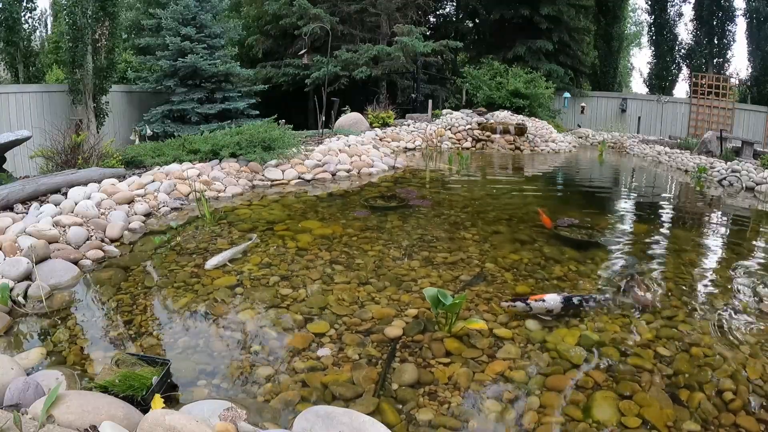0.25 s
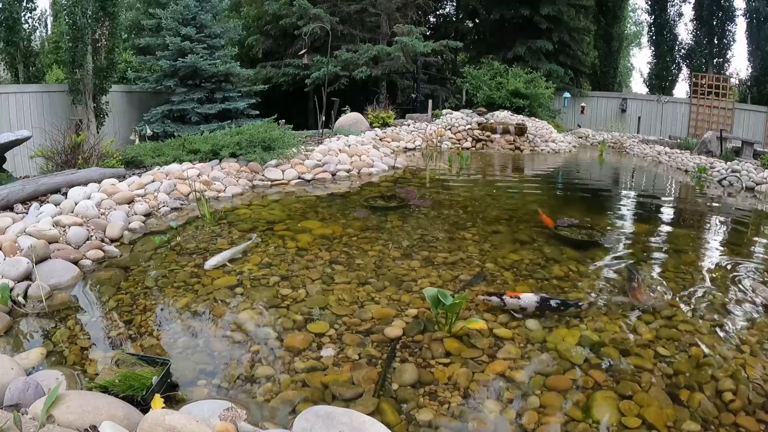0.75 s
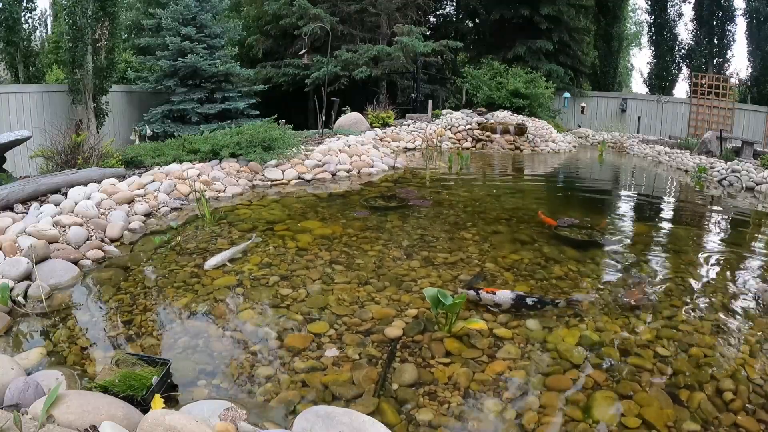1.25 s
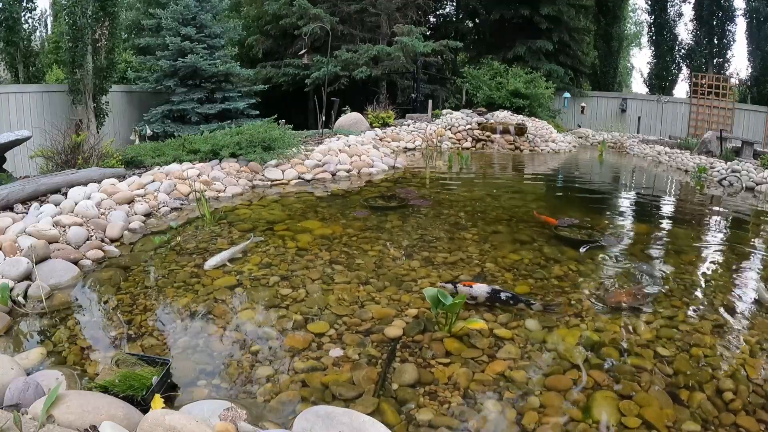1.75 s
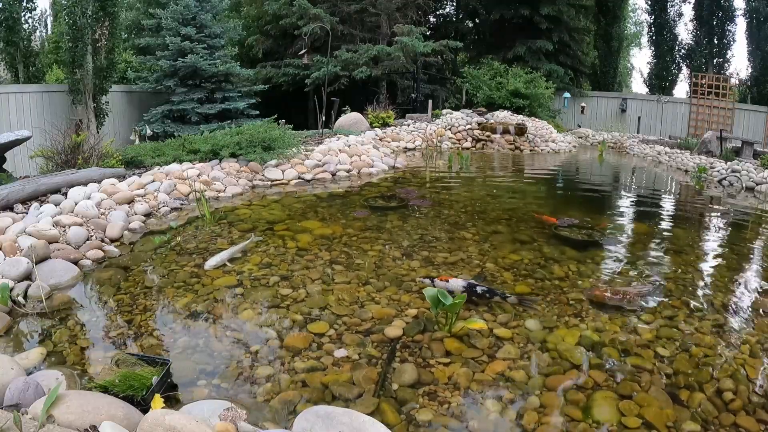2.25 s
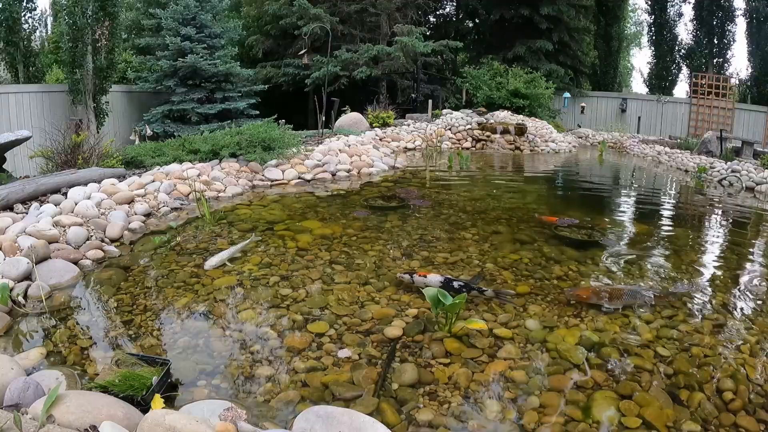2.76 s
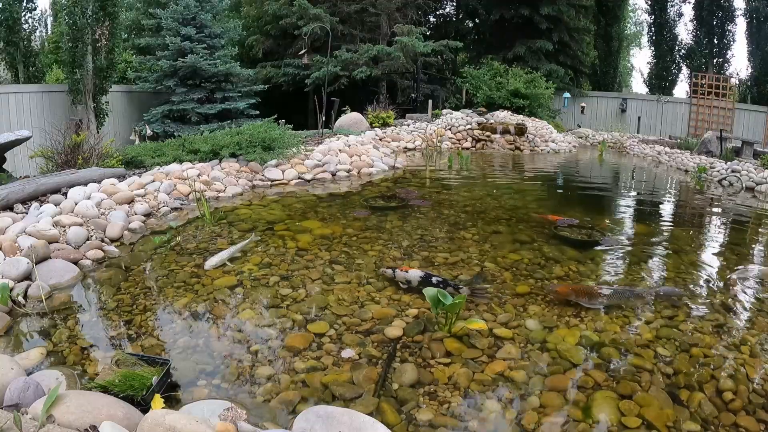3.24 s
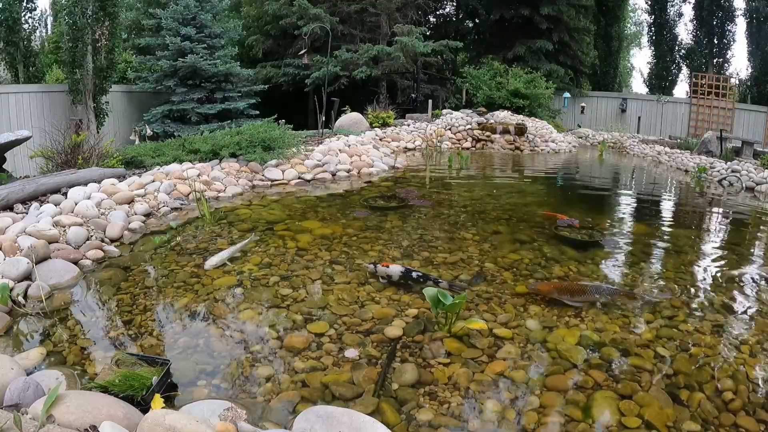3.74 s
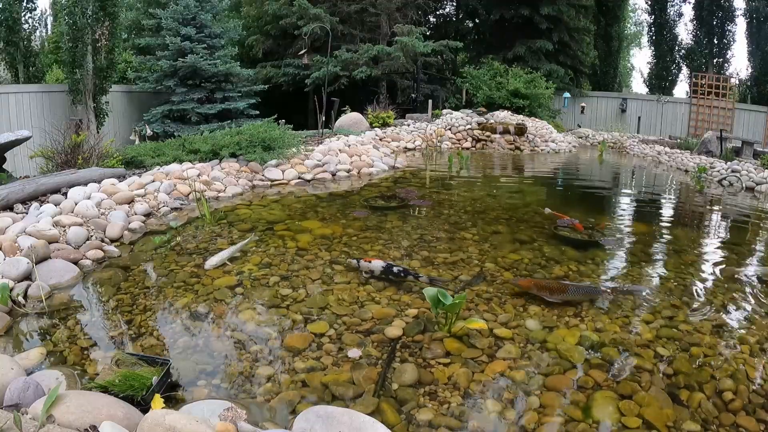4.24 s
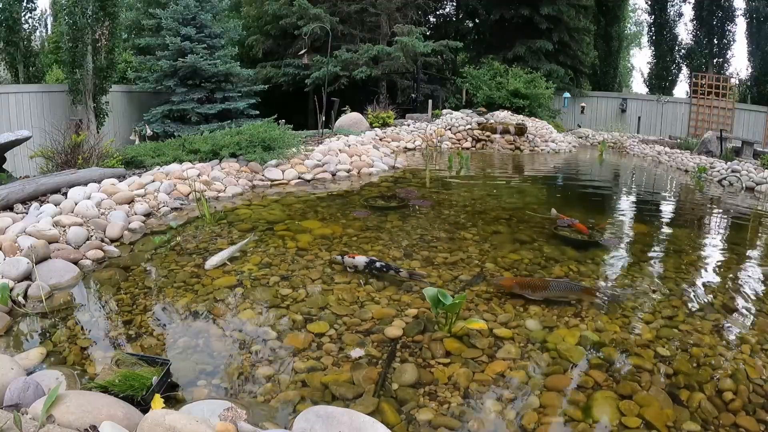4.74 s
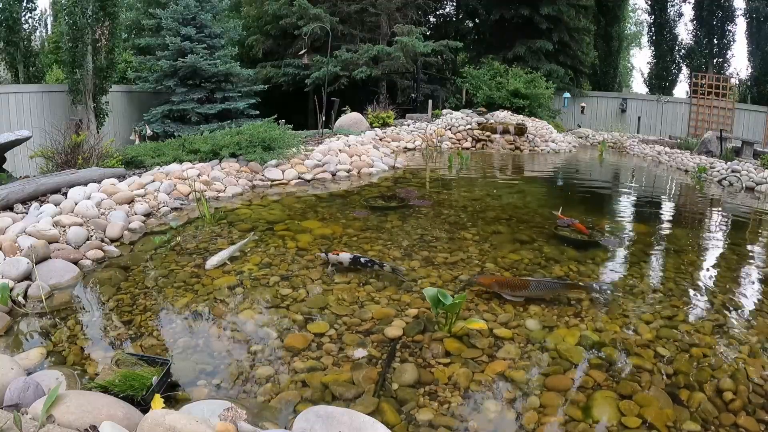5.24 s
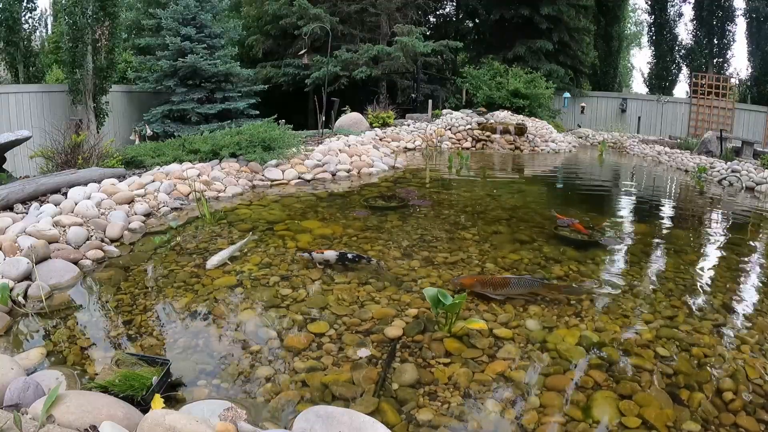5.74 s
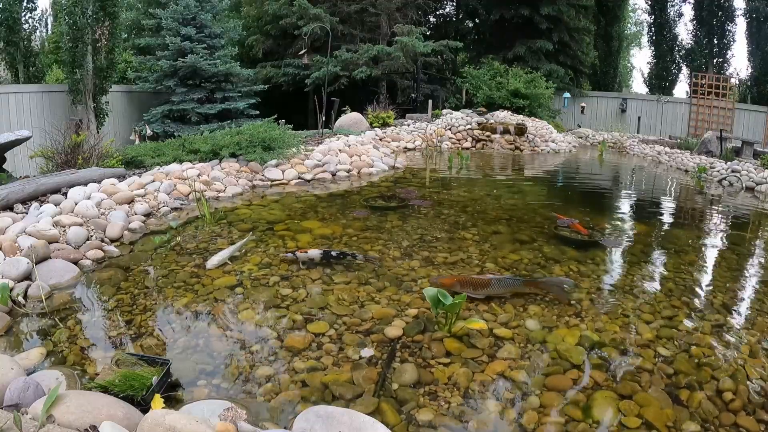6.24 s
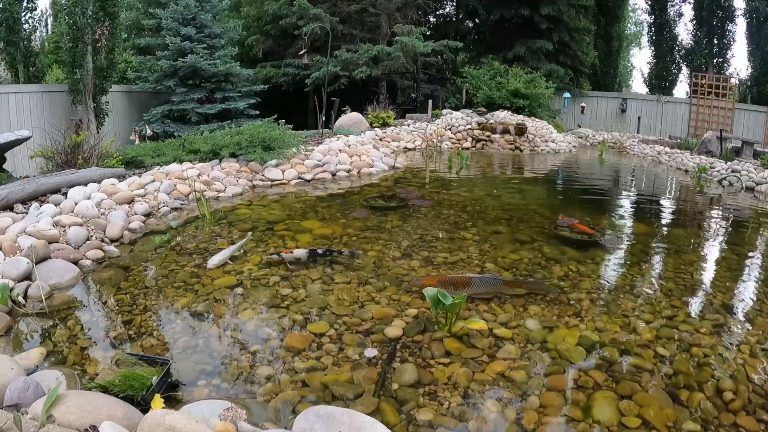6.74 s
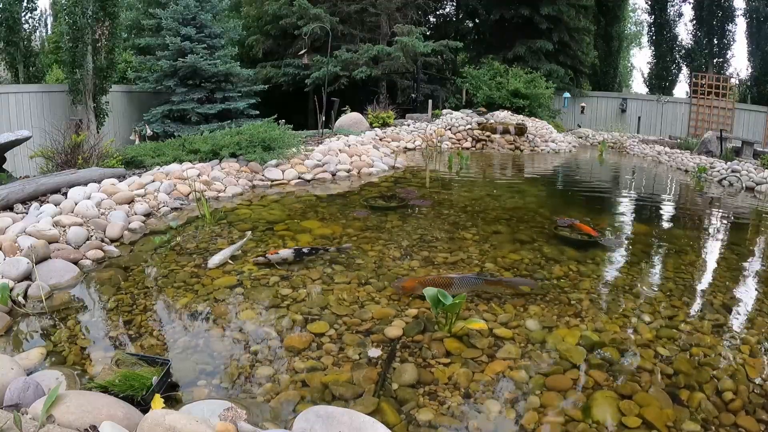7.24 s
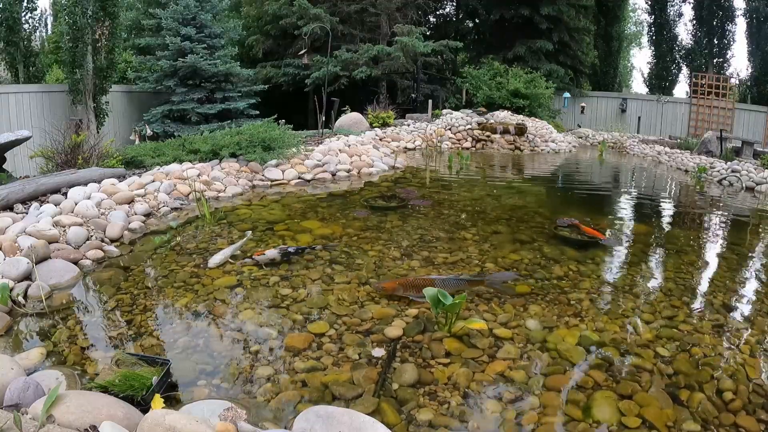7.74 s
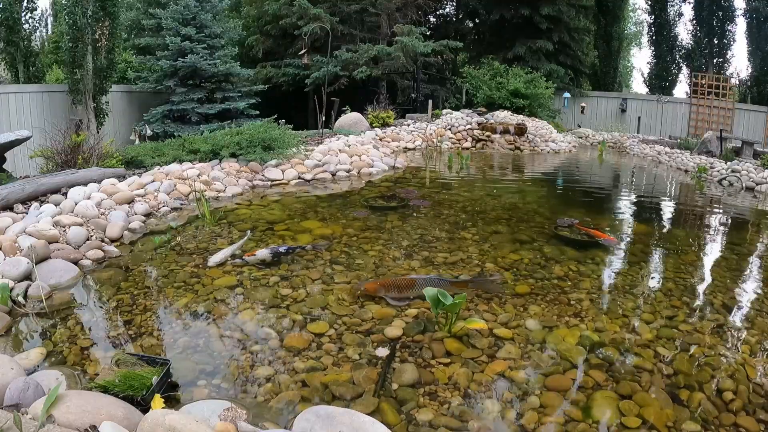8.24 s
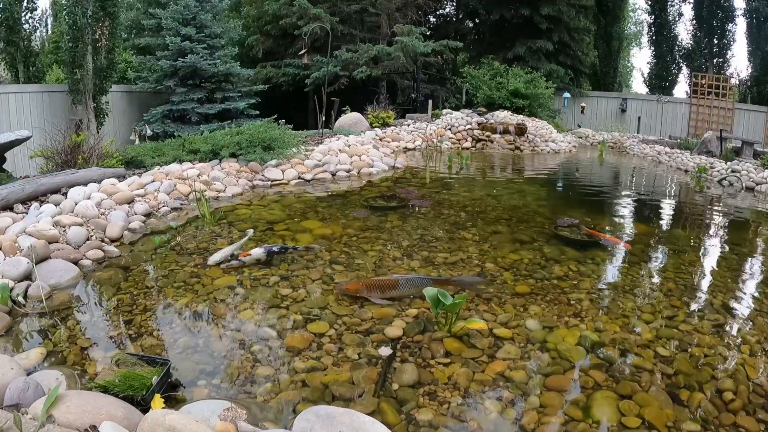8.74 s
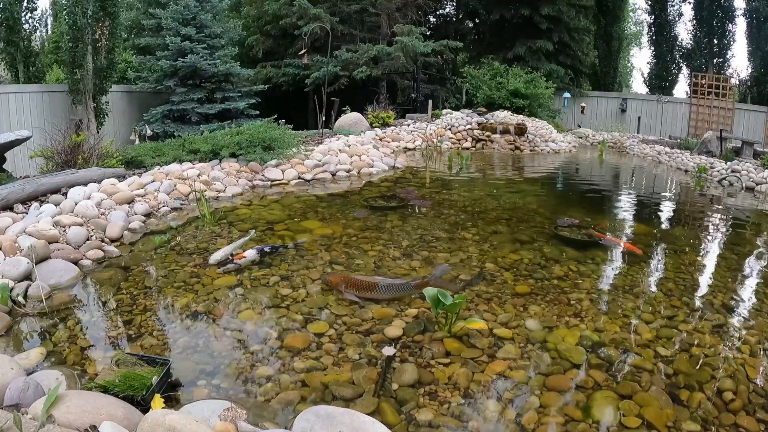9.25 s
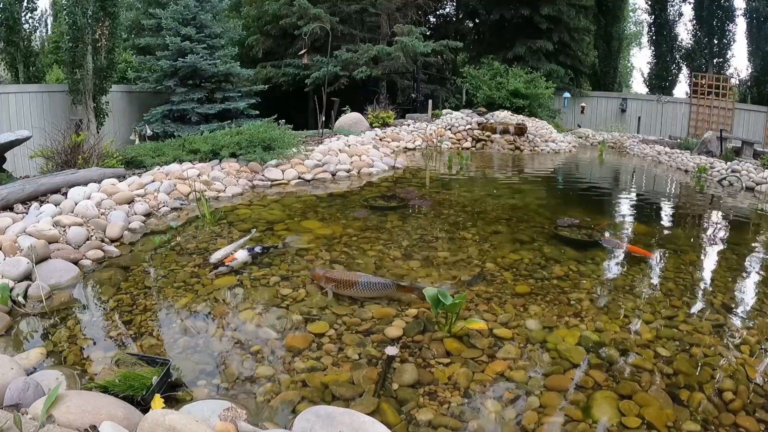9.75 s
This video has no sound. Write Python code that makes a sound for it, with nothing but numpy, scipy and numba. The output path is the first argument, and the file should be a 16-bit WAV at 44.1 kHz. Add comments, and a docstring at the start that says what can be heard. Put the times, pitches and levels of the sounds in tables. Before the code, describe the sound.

Unbroken splashing and trickling in a garden pond, heard in stereo from a few metres away. Bubbles chirp upward over a soft noisy rush, with irregular gurgles, tiny droplet plinks and crisp spatters on stone. Around the middle a watery slap stands out; later comes a cluster of louder gulps and a near plop. Wind rumbles low and unevenly against the microphone throughout.

```python
"""Garden waterfall and pond

A small waterfall spills over stones into a garden pond, a few metres from the microphone.
Sliding sines make the bubbles, tiny clicks the spray, shaped noise the rush, slaps and spatters.
One near drop plops. The fence and stones answer faintly with a short scatter of decaying noise.
A light breeze, low noise in quick swells, rumbles on the microphone."""
import sys
import numpy as np
from scipy import signal
from scipy.fft import rfft, irfft, next_fast_len
from scipy.io import wavfile
from scipy.ndimage import uniform_filter1d, map_coordinates
from numba import njit

SR = 44100
rng = np.random.default_rng(int(sys.argv[2]) if len(sys.argv) > 2 else 0)


def generate_wav(sig):
    """Save sig (samples, or channels by samples) to the path in sys.argv[1] as 16-bit PCM at SR."""
    pcm = np.round(np.clip(np.atleast_2d(sig).T, -1, 1) * 32767).astype(np.int16)
    wavfile.write(sys.argv[1], SR, pcm)


N = 440559  # length in samples, about 10 s
TOP_HZ = 14900  # the band limit, and the highest starting pitch of a clump's bubbles


def amp(db):
    """Turn decibels into a gain."""
    return 10 ** (np.asarray(db) / 20)


def unit(x):
    """Scale to rms 1."""
    return x / np.sqrt(np.mean(x ** 2) + 1e-20)


def along(points, hz):
    """Read a curve of (Hz, value) points on a log frequency axis."""
    point_hz, value = np.transpose(points)
    return np.interp(np.log(hz + 1), np.log(point_hz + 1), value)


def curves(rows):
    """Give one value per sample for each column after the time."""
    time_s, *columns = np.transpose(rows)
    return [np.interp(np.arange(N) / SR, time_s, column) for column in columns]


def wobble(rate):
    """A smooth random curve through rate random points a second."""
    points = rng.standard_normal(int(N * rate / SR) + 4)
    return map_coordinates(points, [np.arange(N) * rate / SR])


def filtered(x, response):
    """Multiply the spectrum of x by a complex response of frequency."""
    size = next_fast_len(N + SR // 2)  # spare room at the end for ringing
    hz = np.fft.rfftfreq(size, 1 / SR)
    return irfft(rfft(x, size) * response(hz), size)[..., :N]


def coloured(x, spectrum):
    """Shape x by (Hz, dB) points, then scale it to rms 1."""
    return unit(filtered(x, lambda hz: amp(along(spectrum, hz))))


def steady(x, span_s):
    """Even out the slow chance swells of x, leaving it at rms 1."""
    power = uniform_filter1d(x ** 2, int(span_s * SR))
    return x / np.sqrt(np.abs(power) + 1e-9)


def swells(rows):
    """A smooth rise and fall of gain for each (start-to-end centre s, dB, length s) row."""
    t = np.arange(N) / SR
    gain = 0
    for centre_s, level_db, length_s in rows:
        phase = np.clip((t - centre_s) / length_s, -.5, .5)
        gain = gain + amp(level_db) * np.cos(np.pi * phase) ** 2
    return gain


def bursts(rows, attack_s, t60, spectrum):
    """Short puffs of noise, one for each (s, dB) row, falling 60 dB in t60 seconds."""
    t = np.arange(N) / SR
    level = 0
    for start_s, level_db in rows:
        attack = np.clip((t - start_s) / attack_s, 0, 1)
        level = level + amp(level_db - 60 * np.abs(t - start_s) / t60) * attack
    return level * coloured(rng.standard_normal(N), spectrum)


@njit
def ringing(start, size, hz, t60, rise, n, sr):
    """A sum of bubbles: sines that swell within a cycle, die away, and climb in pitch by the share rise."""
    out = np.zeros(n)
    for k in range(len(start)):
        first = int(start[k] * sr)
        for i in range(max(0, -first), min(int(t60[k] * sr), n - first)):
            age = i / sr / t60[k]
            cycle = hz[k] * i / sr * (1 + rise[k] * age / 2)
            swell = 1 - np.exp(-3 * cycle)
            decay = np.exp(-np.log(1000) * age)
            out[first + i] += size[k] * swell * decay * np.sin(2 * np.pi * cycle)
    return out


def bubbles(clumps, count, low_hz, high_hz, spread_s, spread_oct, cycles, clump_db, size_db, rise):
    """Clumps of water (so many a second) each trap count bubbles of kindred size, sliding upward."""
    rows = int(clumps * N / SR)
    draw = rng.random((rows, 3 + 5 * count))
    when, kind, weight = draw[:, :3].T[..., None]
    delay, detune, size, life, slide = np.split(draw[:, 3:], 5, axis=1)
    start = when * N / SR + spread_s * delay ** 2
    hz = low_hz * (high_hz / low_hz) ** kind * 2 ** (spread_oct * (2 * detune - 1))
    hz = np.minimum(hz, TOP_HZ)
    # gain grows with pitch, for even power per Hz
    gain = hz * amp(clump_db * weight ** 2 + size_db * size ** 2)
    t60 = cycles * (.5 + life) / hz
    return ringing(start.ravel(), gain.ravel(), hz.ravel(), t60.ravel(), 2 * rise * slide.ravel(), N, SR)


def waterfall(flow_db):
    """The middle of the fall reaches both channels alike, its flanks unlike; all of it surges together."""
    # the slow gushing of the fall, used relative to its average: start_s, strength_db
    gush = [(0.0, -40.5), (0.5, -41.5), (1.55, -40), (1.68, -43), (1.78, -41), (2.2, -40), (2.45, -41.5),
            (2.7, -42.5), (3.06, -40.5), (3.2, -41), (4.4, -41.5), (5.8, -40), (6.05, -42.5), (6.59, -41),
            (7.15, -41.5), (7.76, -41.5), (7.9, -43.5), (8.2, -41.5), (9.0, -41.5), (9.99, -41)]
    # how alike the two channels are: pitch_hz, likeness (0 to 1)
    alike = [(400, 0.86), (1200, 0.92), (2600, 0.99), (4200, 1), (6300, 0.98), (7200, 0.78), (8200, 0.38),
             (10000, 0.77), (12300, 0.67)]
    gush_db, = curves(gush)
    surge_db = .7 * (gush_db - gush_db.mean()) + .4 * wobble(22) + .6 * wobble(80)

    def turn(hz):
        return np.arccos(np.clip(along(alike, hz), 0, 1)) / 2

    middle = filtered(splashing(), lambda hz: np.cos(turn(hz)))
    flanks = filtered(splashing(), lambda hz: np.sin(turn(hz)))
    return np.array([middle + flanks, middle - flanks]) * amp(flow_db + surge_db)


def splashing():
    """A dense trickle of bubbles, chirps, fine fizz and spray over the rush of the falling sheet."""
    # tone colour of the water: pitch_hz, relative level_db
    water_colour = [(150, -7.5), (400, -1), (720, -3), (920, -.5), (2100, -3), (3000, -4.5), (4000, -6.5),
                    (5500, -11.5), (7000, -16.5), (8300, -21), (10000, -25.5), (12300, -30.5),
                    (14000, -38.5), (15000, -63)]
    trickle = bubbles(clumps=270, count=2, low_hz=520, high_hz=3390, spread_s=.012, spread_oct=.45,
                      cycles=22, clump_db=4, size_db=7, rise=0.14)
    # bubbles close under the surface ring longer and slide further up
    chirps = bubbles(clumps=150, count=1, low_hz=857.0, high_hz=5970, spread_s=.03, spread_oct=0.31,
                     cycles=56, clump_db=3, size_db=7, rise=.22)
    fizz = bubbles(clumps=400, count=3, low_hz=2600, high_hz=12340, spread_s=.007, spread_oct=0.31,
                   cycles=16.6, clump_db=2, size_db=5.5, rise=0.06)
    ticks = amp(1.3 * wobble(10)) * coloured(spray(rate=1500, size_db=10), water_colour)
    # the finest droplets fly off in fitful showers
    mist_colour = [(4000, -30), (7000, 0), (9000, -1), (12300, -3), (14000, -13), (15000, -40)]
    mist = amp(3.5 * wobble(12)) * coloured(spray(rate=260, size_db=18), mist_colour)
    rush = coloured(rng.standard_normal(N), water_colour)
    ring = amp(-6.0) * coloured(trickle, water_colour)
    ring += amp(-11.0) * coloured(chirps, water_colour)
    ring += amp(-10.5) * coloured(fizz, water_colour)
    return ring + amp(-9.0) * ticks + amp(-33.5) * mist + amp(-6.5) * rush


def spray(rate, size_db):
    """Droplets strike stone and water: a crackle of tiny impacts of uneven size, rate a second."""
    when, size, sign = rng.random((int(rate * N / SR), 3)).T
    clicks = np.sign(sign - .5) * amp(size_db * size ** 2)
    return np.bincount((when * N).astype(int), clicks, N)


def hollows(x):
    """Gaps between the stones favour a few pitches, each a resonant boost."""
    # hollows between the stones: pitch_hz, width_hz, boost_db
    gaps = [(935, 70, 2.5), (1236, 73, 3.5), (1873, 500, 4), (2590, 53, 4), (5650, 700, 2.5)]

    def response(hz):
        total = amp(-0.33)
        for centre, width, boost_db in gaps:
            band = 1j * hz * width / (centre * centre - hz * hz + 1j * hz * width)
            total = total * (1 + (amp(boost_db) - 1) * band)
        return total

    return filtered(x, response)


def gulps(count=2):
    """A pocket of air rings, sliding further up the longer it rings, and sheds a smaller bubble just after."""
    # the loudest gulps of trapped air: start_s, level_db, starting pitch_hz,
    # cycles (at that pitch) until it dies away
    pockets = [(0.146, -29.5, 875, 22), (0.189, -25, 3000, 24), (0.400, -31, 1120, 22),
               (0.678, -26, 1530, 22), (0.870, -26, 2550, 26), (0.990, -32, 690, 22),
               (1.567, -29, 1270, 24), (1.585, -24, 2670, 24), (1.996, -22, 2170, 20),
               (2.131, -30, 1890, 22), (2.231, -29, 2420, 22), (2.265, -23, 3350, 22),
               (2.626, -29, 870, 28), (2.814, -29, 920, 26), (2.827, -23, 1440, 20), (3.073, -28, 1630, 24),
               (3.250, -30.5, 685, 16), (3.361, -27, 1120, 22), (3.386, -25, 3000, 18),
               (3.414, -24, 3080, 26), (3.453, -30.5, 1000, 39), (3.569, -26, 1130, 39),
               (3.908, -27, 860, 22), (3.977, -27, 2350, 32), (4.403, -25, 1630, 22),
               (5.037, -31, 1120, 22), (5.446, -23, 2580, 23), (5.729, -27, 2840, 20),
               (6.343, -30, 1120, 24), (6.367, -24.5, 1800, 26), (7.035, -25.5, 1720, 24),
               (7.044, -19.5, 3350, 18), (7.253, -23.5, 3100, 29), (7.413, -28, 2580, 32),
               (7.511, -26.5, 770, 22), (8.219, -23.5, 2060, 26), (8.800, -28, 2130, 22),
               (8.874, -29, 1170, 29), (8.926, -28, 1620, 24), (9.092, -30, 2560, 24),
               (9.196, -27, 1190, 24), (9.373, -25.5, 1200, 22), (9.742, -26, 1370, 24)]
    s, db, hz, cycles = np.transpose(pockets)[..., None]
    delay, detune, size = np.split(rng.random((len(s), 3 * count)), 3, axis=1)
    follower = np.arange(count) > 0  # every bubble but the first
    start = s + 0.006 * delay * follower
    pitch = hz * 2 ** (follower * (0.5 * detune + 0.18))
    gain = amp(db - follower * (6 + 10 * size))
    t60 = cycles / pitch
    rise = np.repeat(.1 * (cycles / 22) ** 3, count)
    return ringing(start.ravel(), gain.ravel(), pitch.ravel(), t60.ravel(), rise, N, SR)


def gurgles():
    """A thicker lump of water comes over the edge and churns up a dense cloud of bubbles."""
    # gurgling clouds of bubbles: crest_s, level_db at the crest, length_s
    clouds = [(1.58, -42, .06), (1.97, -42, 0.11), (3.04, -42, .12), (3.39, -41, 0.063), (4.2, -43, 0.12),
              (4.88, -39, .09), (5.04, -43, .11), (5.58, -43, .08), (6.61, -41, 0.073), (7.77, -45, 0.11),
              (8.26, -43, 0.088), (9.1, -41, 0.1), (9.2, -45, .06), (9.95, -41, .1)]
    churn = bubbles(clumps=700, count=1, low_hz=1200, high_hz=3000, spread_s=.01, spread_oct=.2,
                    cycles=20, clump_db=2, size_db=3, rise=.12)
    colour = [(700, -9), (1200, 3), (2000, 0), (2800, -3), (4200, 0)]
    return swells(clouds) * coloured(churn, colour)


def plinks():
    """Single droplets each trap one tiny, bright bubble."""
    # small bright bubbles: start_s, level_db, starting pitch_hz
    droplets = [(0.334, -27, 4900), (0.371, -30, 5080), (0.655, -30, 5800), (0.900, -26, 5140),
                (2.22, -27.5, 5450), (2.76, -27.5, 4400), (3.602, -28.5, 5130), (3.700, -27, 4550),
                (4.692, -30, 5450), (4.763, -30, 4220), (5.074, -26, 4100), (5.376, -26, 4390),
                (5.727, -26, 3680), (5.750, -27, 5800), (5.953, -27, 4390), (6.443, -27, 5750),
                (6.470, -26, 3960), (7.026, -25, 4550), (7.257, -29.5, 5420), (7.572, -27, 5080),
                (8.419, -26, 5200), (8.791, -21.5, 3980), (9.847, -25.5, 5800)]
    s, db, hz = np.transpose(droplets).copy()
    return ringing(s, amp(db), hz, 22 / hz, np.full_like(s, .08), N, SR)


def slaps():
    """A lump of water smacks the surface: a short burst of noise, duller than the spray."""
    # dull slaps of water on the pond: start_s, starting level_db
    smacks = [(1.241, -30), (4.0675, -25), (7.0335, -26), (7.152, -33), (7.509, -29.5)]
    colour = [(400, -30), (900, -6), (1700, 0), (2700, -7), (3800, -28), (8000, -80)]
    return bursts(smacks, .001, .028, colour)


def spatters():
    """Bigger droplets burst on stone in a short bright hiss."""
    # sharp spatters on the stones: start_s, starting level_db
    splats = [(0.333, -43), (0.393, -43), (0.783, -42), (1.661, -43), (1.8524, -42), (2.545, -42),
              (2.723, -43.5), (3.026, -46), (3.140, -45), (3.154, -44), (4.444, -43), (5.092, -44.5),
              (5.221, -43), (5.976, -44.5), (6.137, -45.5), (6.530, -43.5), (6.8365, -37.5), (7.150, -45),
              (7.559, -45), (7.642, -44), (7.685, -45), (8.688, -42), (9.051, -46), (9.066, -46)]
    colour = [(1000, -17), (5000, 6), (9000, 0), (12500, -9), (14800, -40)]
    return bursts(splats, .0003, .016, colour)


def plop():
    """One near drop: a tick, and its ringing bubble, too small to push out any bass."""
    # the near drop: start_s, level_db, starting pitch_hz, t60_s (time to fall 60 dB)
    drop = [(7.5095, -18.5, 880, .034)]
    s, db, hz, t60 = np.transpose(drop).copy()
    tick = ringing(s, amp(db - 5), hz * 3.3, t60 / 12, np.zeros_like(s), N, SR)
    bubble = ringing(s, amp(db), hz, t60, np.full_like(s, .08), N, SR)
    no_bass = signal.butter(2, 650, "high", fs=SR, output="sos")
    return signal.sosfilt(no_bass, tick + bubble)


def garden(x, t60, echo_db):
    """Stones and fence add a faint, short scatter, different in each channel."""
    t = np.arange(SR // 4) / SR
    tail = rng.standard_normal((2, len(t))) * amp(-60 * t / t60)
    scatter = signal.fftconvolve(x, tail / np.linalg.norm(tail[0]), axes=1)[:, :N]
    return x + amp(echo_db) * scatter


def from_the_right(x):
    """The fall lies a little to the right: at most pitches that channel hears it sooner and louder."""
    # level between the channels: pitch_hz, left minus right level_db
    lean = [(500, 0.5), (1050, -1.5), (1280, -1.5), (1600, -3.2), (2300, -2), (4300, -1), (6600, -1),
            (9000, -3), (10700, 1.3), (14000, -0.5)]
    # timing between the channels: pitch_hz, phase by which left leads (radians)
    lead = [(300, -0.18), (650, -0.15), (900, -0.44), (1450, -0.36), (1800, -0.13), (3000, -0.4),
            (4200, -0.55), (6600, -0.024), (7500, -0.096), (9700, 0.43), (13000, -0.21)]
    sides = np.array([[1], [-1]])

    def response(hz):
        loudness = amp(sides * along(lean, hz) / 2)
        return loudness * np.exp(.5j * sides * along(lead, hz))

    return filtered(x, response)


def breeze():
    """Air buffets the microphone in quick swells, nearly alike in both channels; puffs add higher eddies."""
    # tone colour of the rumble, then of the flutter: pitch_hz, relative level_db
    rumble_colour = [(10, -32), (28, -7), (43, 2.5), (60, -1), (100, -2.5), (135, -7), (190, -19.5),
                     (300, -47), (600, -90)]
    flutter_colour = [(60, -6), (120, -5.5), (170, 0), (250, -7), (330, -15), (500, -28.5), (900, -38),
                      (2500, -82)]
    # low rumble before its swells: start_s, level_db
    rumble_level = [(0, -34), (0.17, -27.5), (0.4, -29), (0.65, -26.5), (0.88, -25), (0.97, -31.5),
                    (1.95, -29.5), (2.2, -33), (2.75, -30), (2.93, -36), (3.35, -27.5), (3.57, -33),
                    (3.72, -29.5), (4.2, -29), (4.3, -30.5), (4.78, -31), (4.87, -38), (5.35, -35),
                    (5.62, -28), (5.8, -35.5), (5.88, -23.5), (6.1, -32.5), (6.24, -25), (6.36, -35),
                    (6.52, -34), (6.62, -26), (7.2, -29), (7.6, -27), (7.85, -27.5), (8.25, -27),
                    (8.5, -29.5), (9.99, -29)]
    # sharper puffs, a higher flutter, before trim and swells: start_s, level_db
    flutter_level = [(0, -38.5), (0.8, -38), (1.4, -34), (1.7, -39), (1.92, -37.5), (2.25, -40.5),
                     (2.48, -40.5), (2.73, -42), (3.1, -45), (3.37, -39.5), (3.58, -42), (3.75, -37.5),
                     (4.35, -34.5), (4.5, -38.5), (5.08, -44), (5.55, -44.5), (5.9, -37), (6.06, -40.5),
                     (6.5, -44), (7.0, -41), (7.2, -42.5), (8.1, -42), (8.55, -44.5), (8.95, -42.5),
                     (9.7, -45.5), (9.99, -40)]
    # whoosh of the strongest puffs, before trim and swells: start_s, level_db
    whoosh_level = [(0, -49), (0.6, -55.5), (0.78, -42), (1.05, -52), (1.3, -43), (1.85, -57), (3.0, -60.5),
                    (3.75, -52), (4.25, -53), (5.05, -56), (5.55, -64), (5.92, -50), (6.3, -62.5),
                    (9.99, -62)]
    whoosh_colour = [(150, -18), (320, 7.0), (520, 7.0), (800, -5.5), (1600, -44), (4000, -100)]
    rumble_db, = curves(rumble_level)
    flutter_db, = curves(flutter_level)
    whoosh_db, = curves(whoosh_level)
    swell_rate = 14  # random points a second
    rumble_swell_db, flutter_swell_db = 1.1, 1.6  # typical depth of the swells

    rumble = steady(coloured(rng.standard_normal(N), rumble_colour), span_s=0.28)
    rumble = amp(rumble_db + rumble_swell_db * wobble(swell_rate)) * rumble
    # one shared noise plus a little that differs between the channels
    eddies = rng.standard_normal(N) + amp(-17.5) * rng.standard_normal((2, N))
    flutter_gain = amp(flutter_db - 0.27 + flutter_swell_db * wobble(swell_rate))
    flutter = flutter_gain * coloured(eddies, flutter_colour)
    whoosh_gain = amp(whoosh_db - 0.5 + flutter_swell_db * wobble(swell_rate))
    whoosh = whoosh_gain * coloured(rng.standard_normal(N), whoosh_colour)
    return (rumble + flutter + whoosh) * amp([[.2], [-.2]])  # left a touch louder


def buffets():
    """Single eddies hit the microphone as short, soft thumps of low noise."""
    # thumping eddies: crest_s, level_db at the crest, length_s
    thumps = [(0.79, -31, 0.19), (1.51, -28, .16), (1.86, -28.5, 0.1), (4.0, -27, 0.14), (4.2, -26, 0.11),
              (5.95, -29, 0.11), (6.72, -30, 0.13), (7.02, -30, 0.32), (7.32, -34, .16), (7.58, -25, 0.15),
              (8.06, -26.5, 0.12), (8.28, -27.5, 0.21), (8.86, -29.5, .16), (9.5, -35.5, .16)]
    colour = [(40, -20), (80, -3), (125, 0), (165, -5), (215, -21), (310, -48), (700, -120)]
    return swells(thumps) * steady(coloured(rng.standard_normal(N), colour), span_s=.06)


def scene():
    """The water across the pond, and the breeze at the microphone."""
    water = hollows(waterfall(flow_db=-40.0))
    water = water + gulps() + gurgles() + plinks() + slaps() + spatters() + plop()
    across_pond = from_the_right(garden(water, t60=0.36, echo_db=-15.5))
    return across_pond + breeze() + buffets()


def record(dry):
    """The microphone keeps nothing above its band limit."""
    return filtered(dry, lambda hz: hz < TOP_HZ)


dry = scene()
out = record(dry)
generate_wav(out)
```